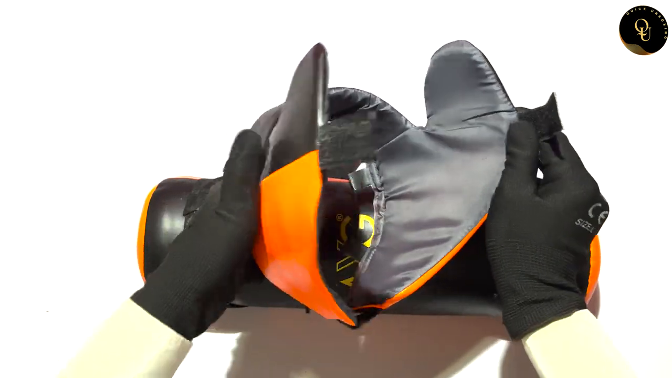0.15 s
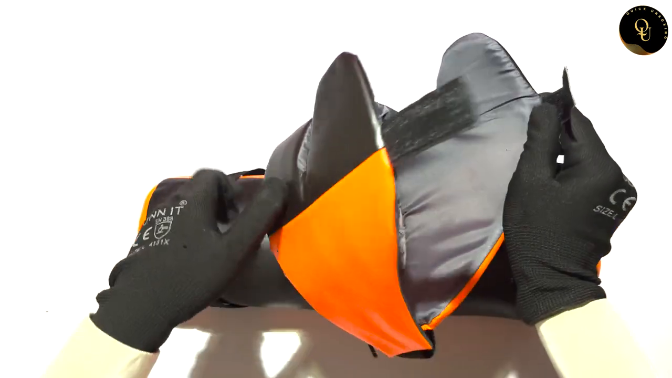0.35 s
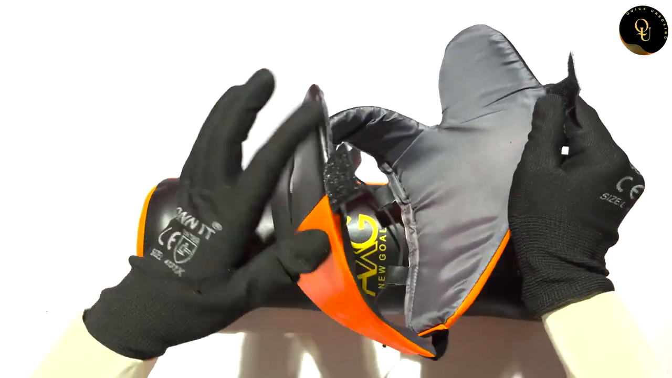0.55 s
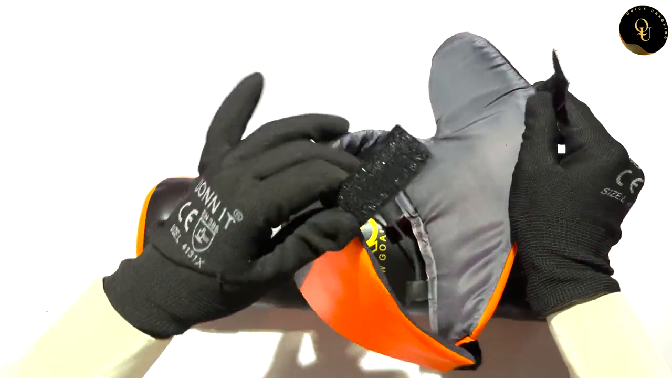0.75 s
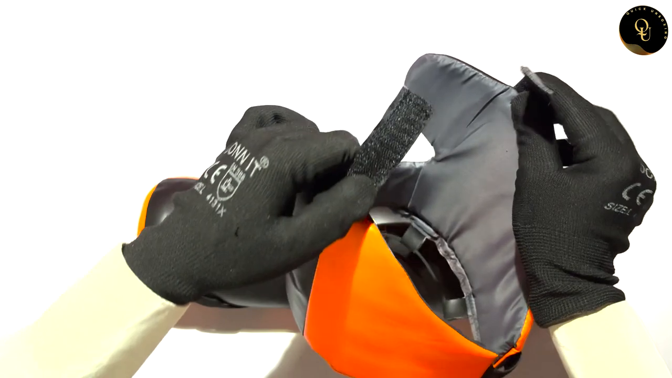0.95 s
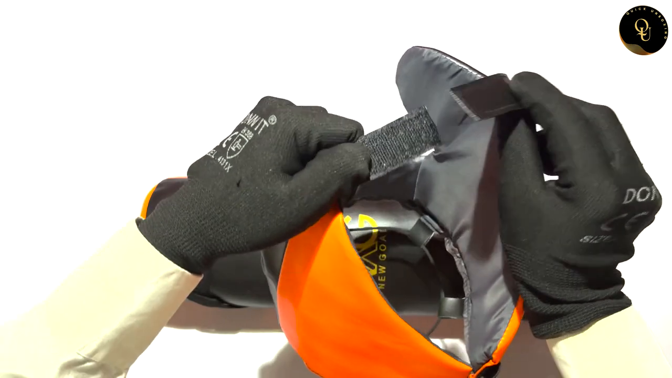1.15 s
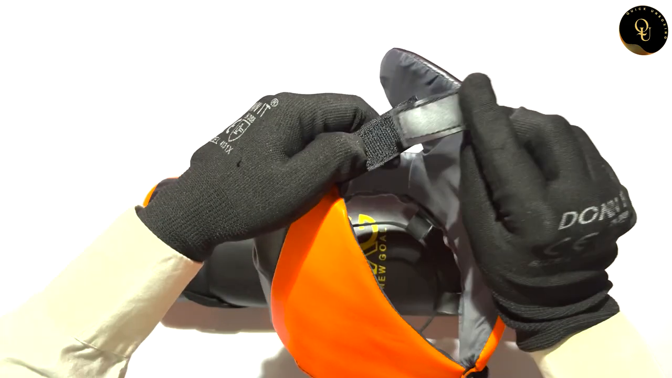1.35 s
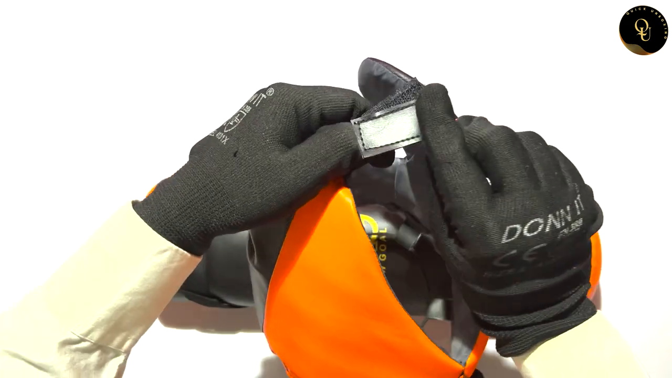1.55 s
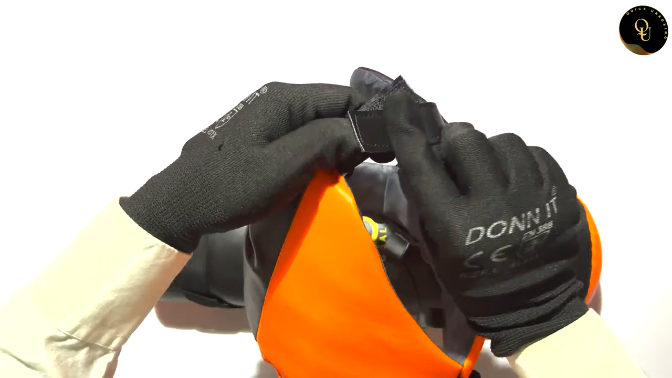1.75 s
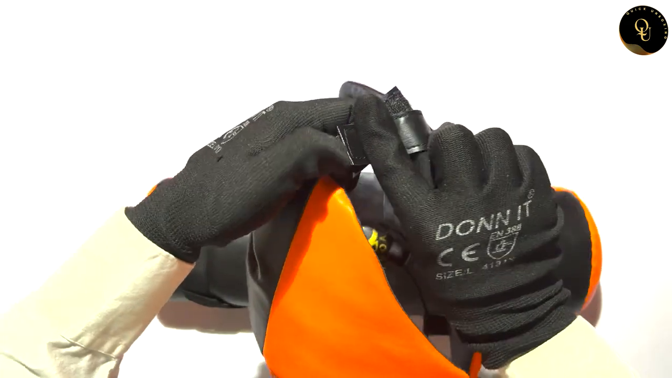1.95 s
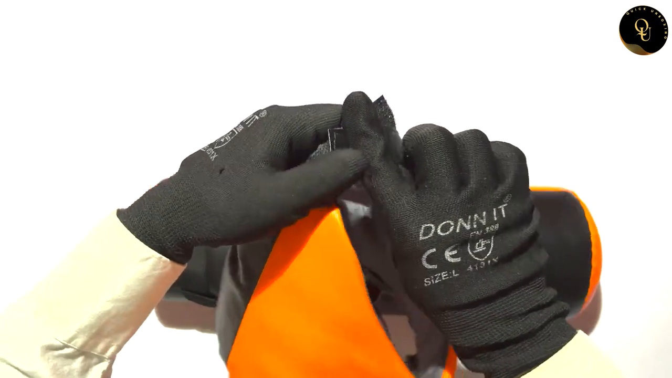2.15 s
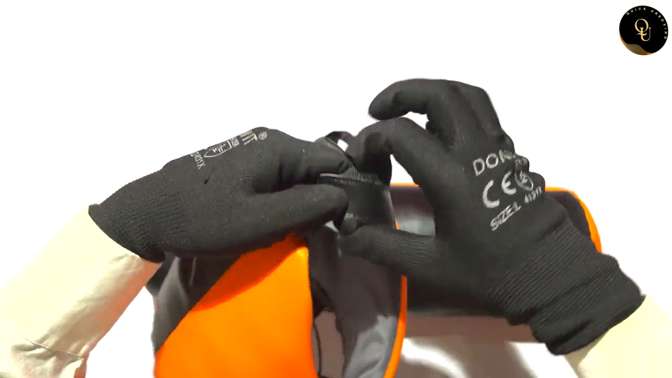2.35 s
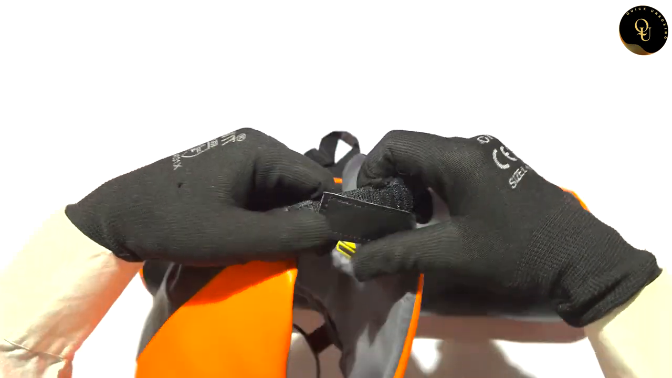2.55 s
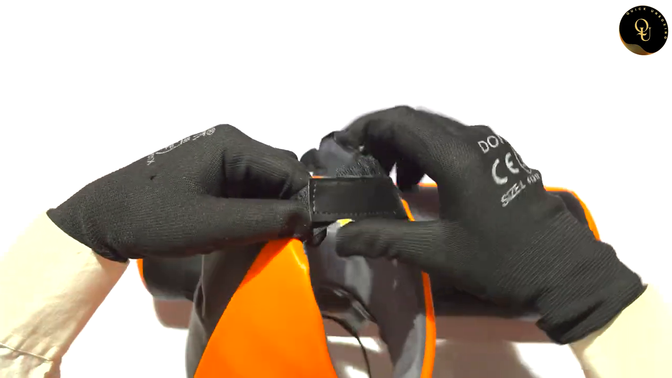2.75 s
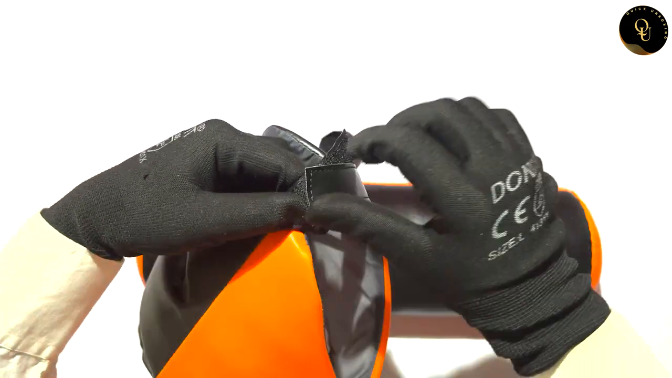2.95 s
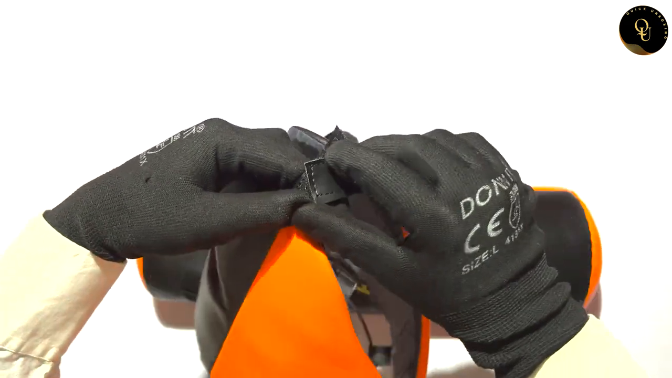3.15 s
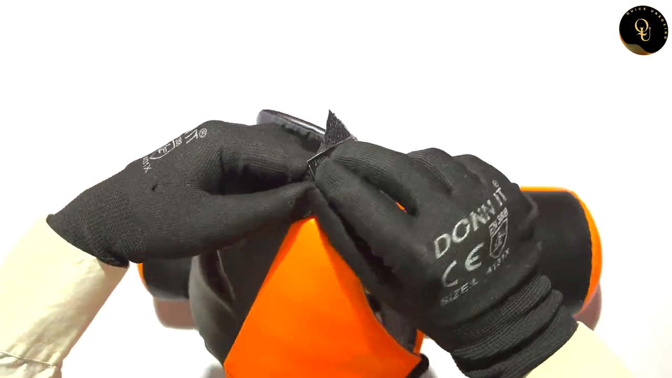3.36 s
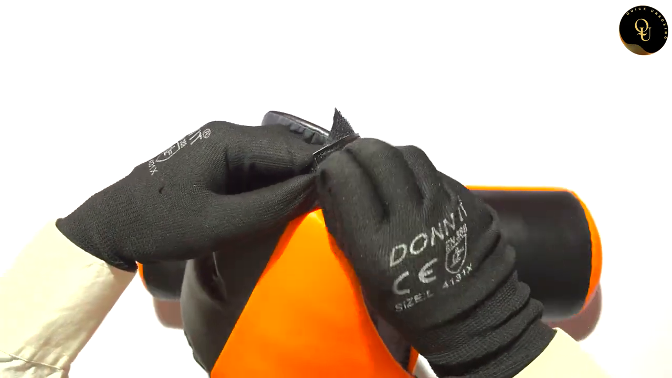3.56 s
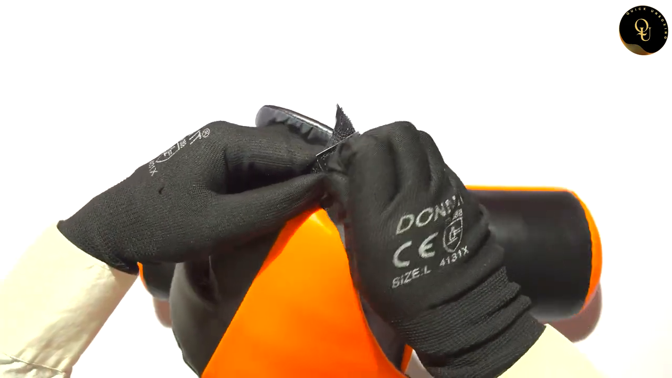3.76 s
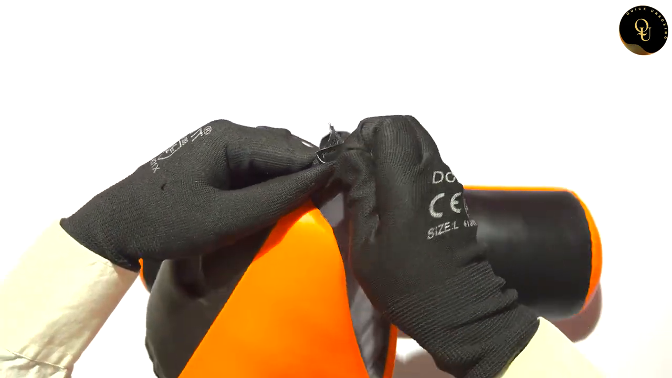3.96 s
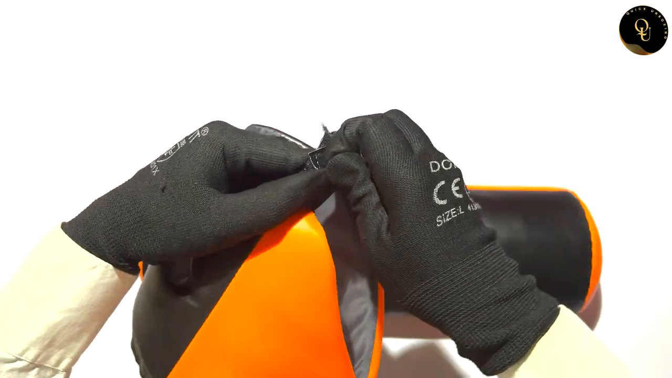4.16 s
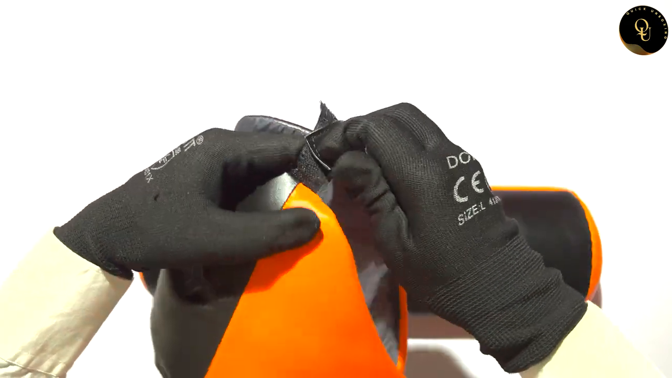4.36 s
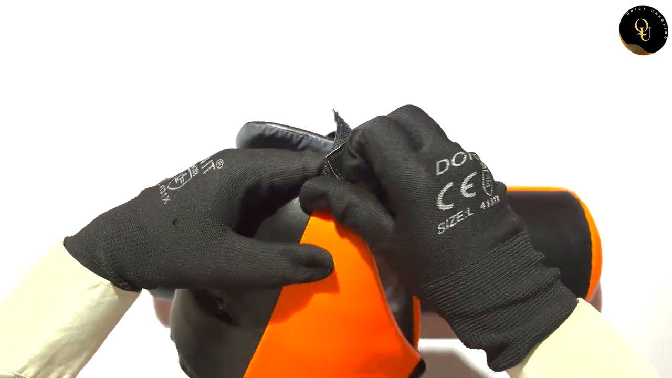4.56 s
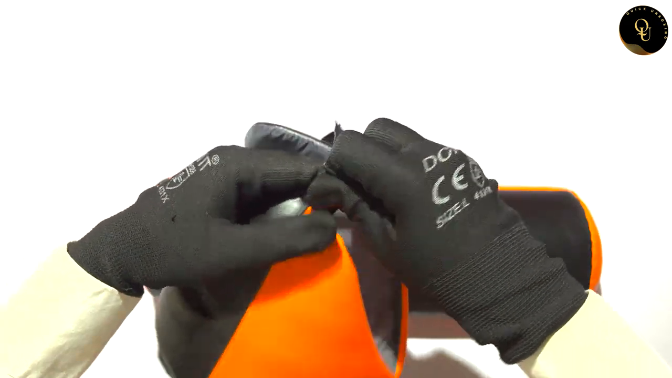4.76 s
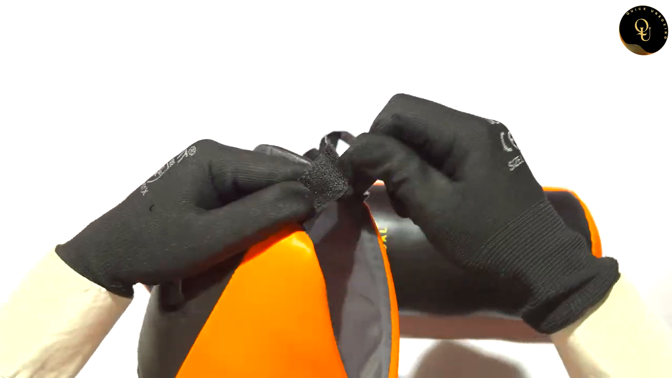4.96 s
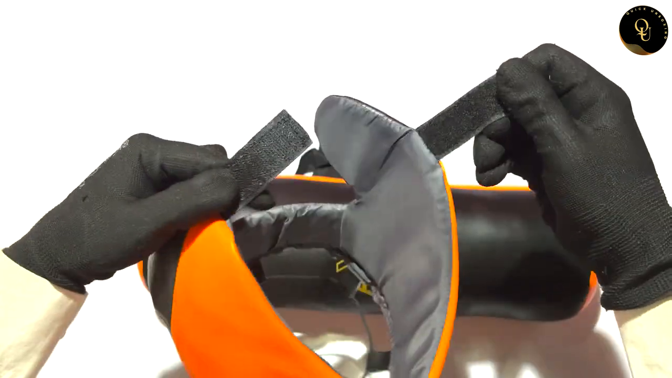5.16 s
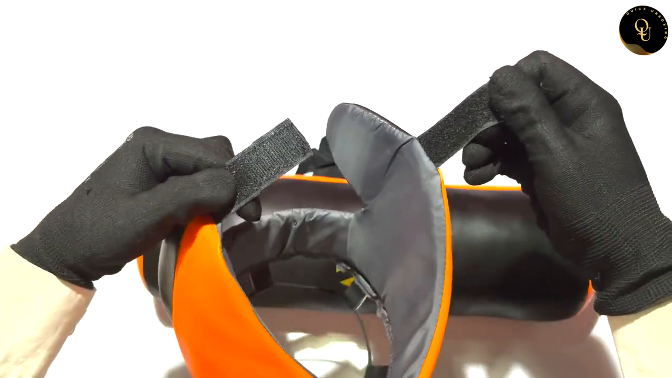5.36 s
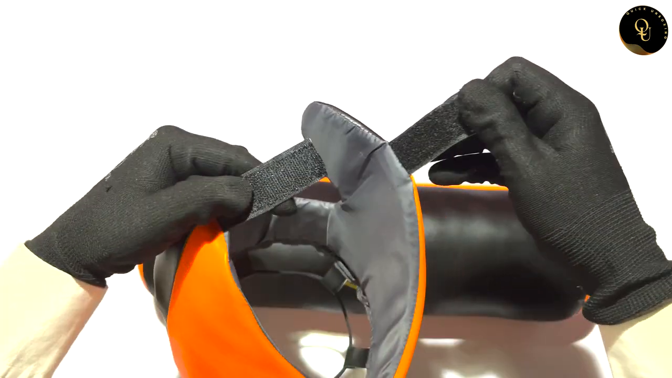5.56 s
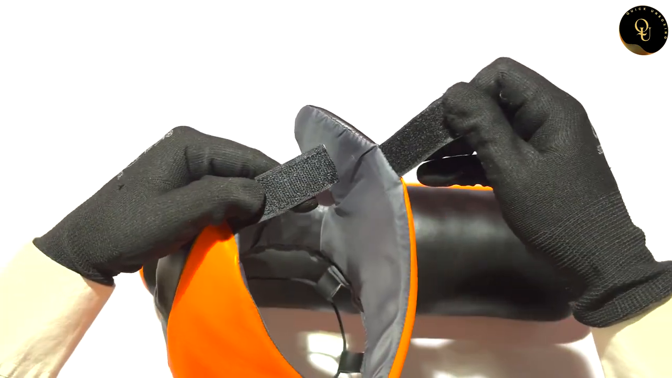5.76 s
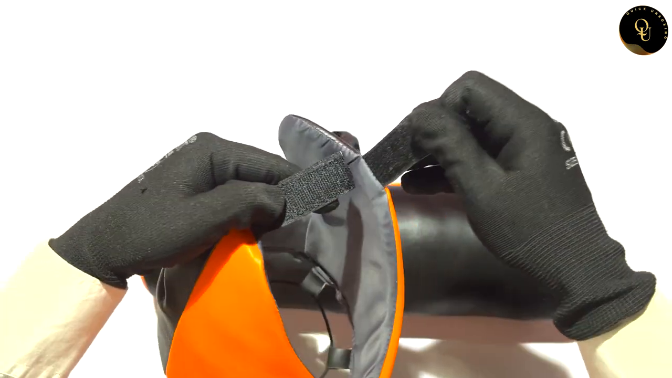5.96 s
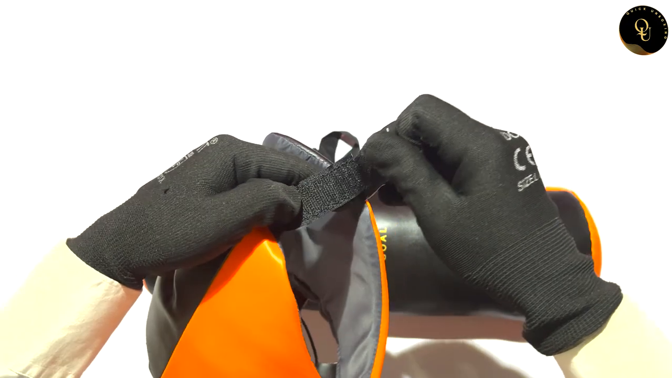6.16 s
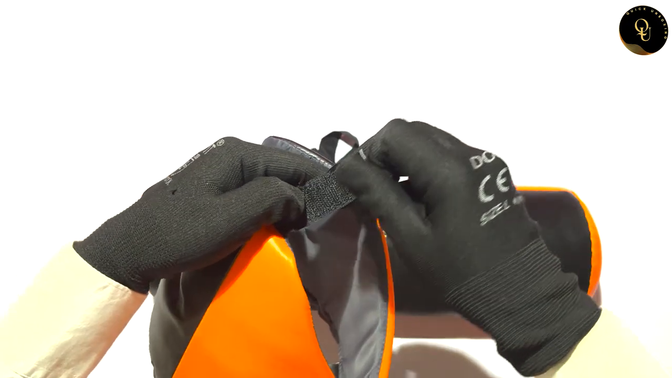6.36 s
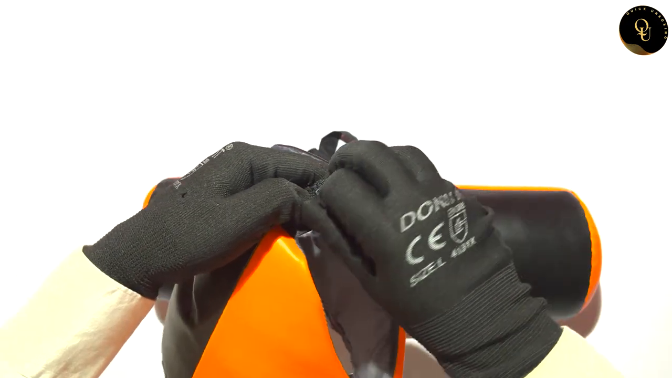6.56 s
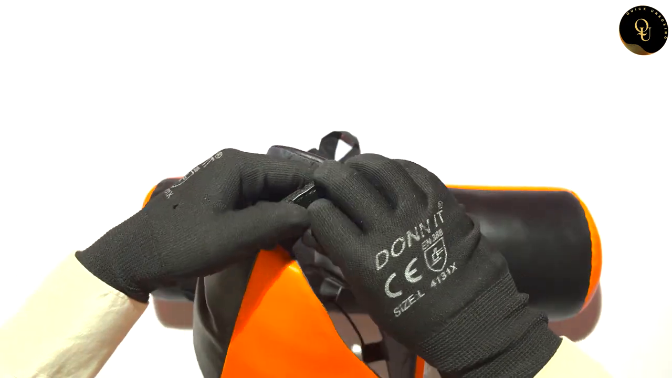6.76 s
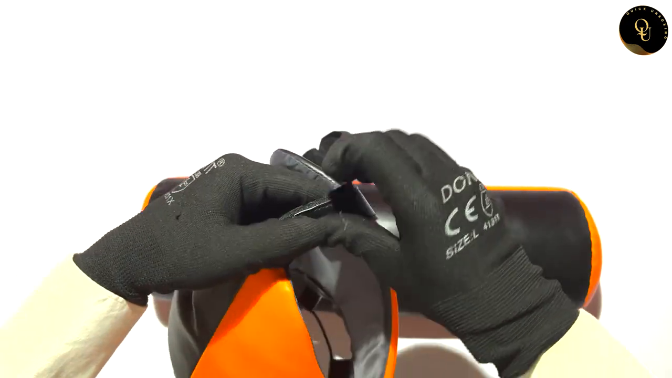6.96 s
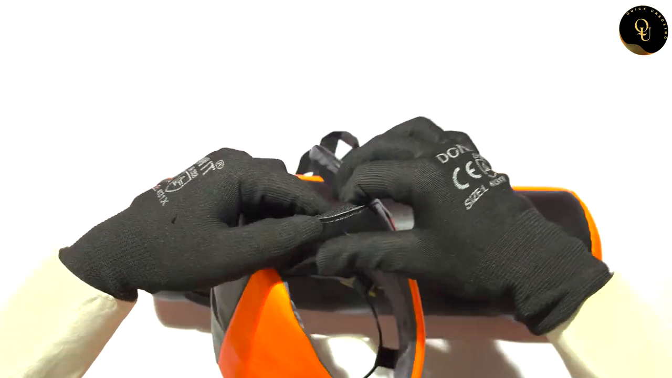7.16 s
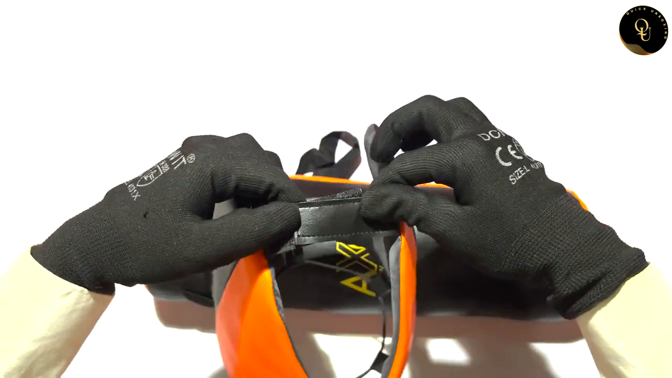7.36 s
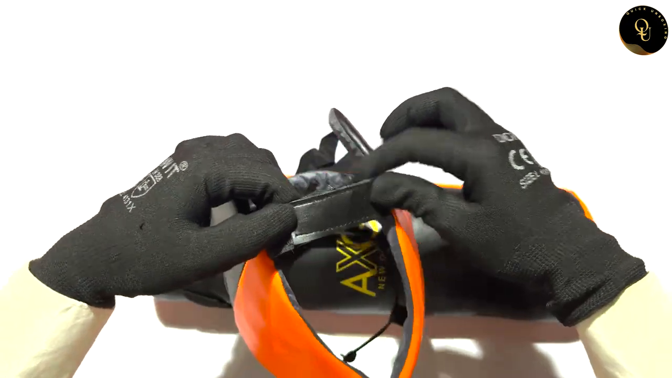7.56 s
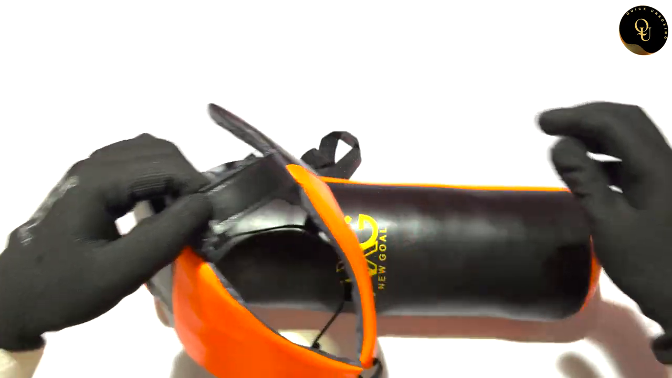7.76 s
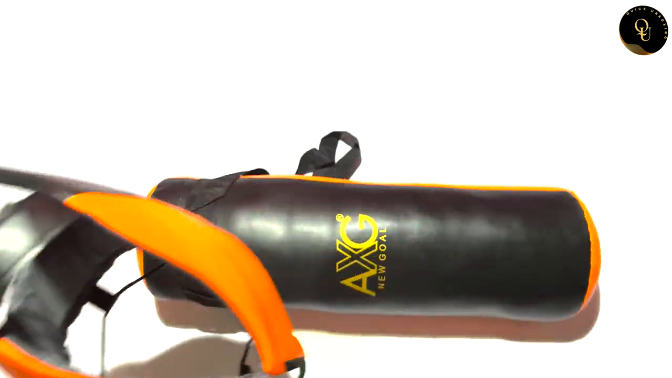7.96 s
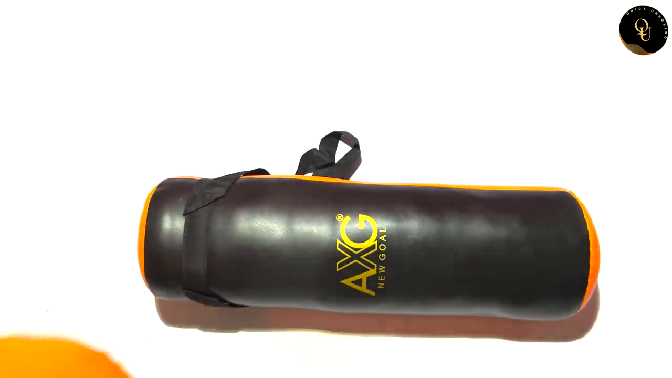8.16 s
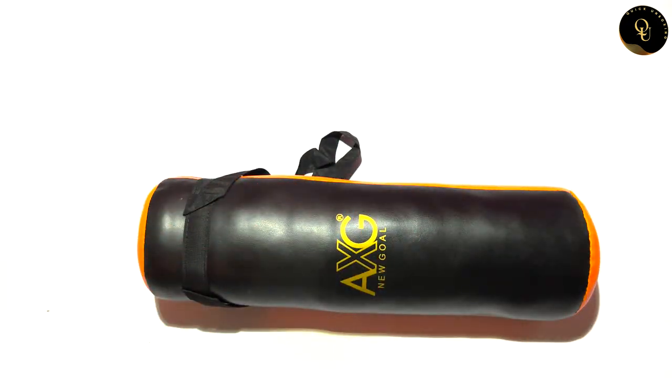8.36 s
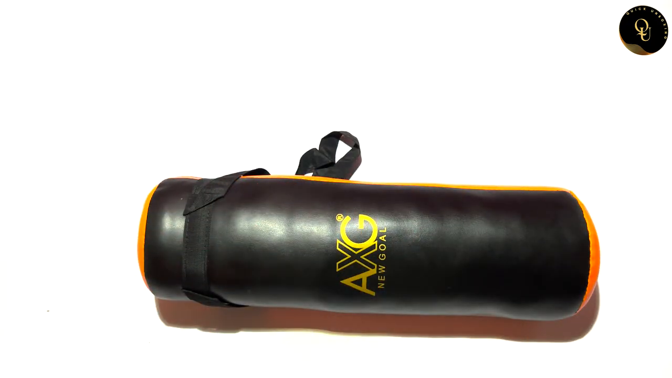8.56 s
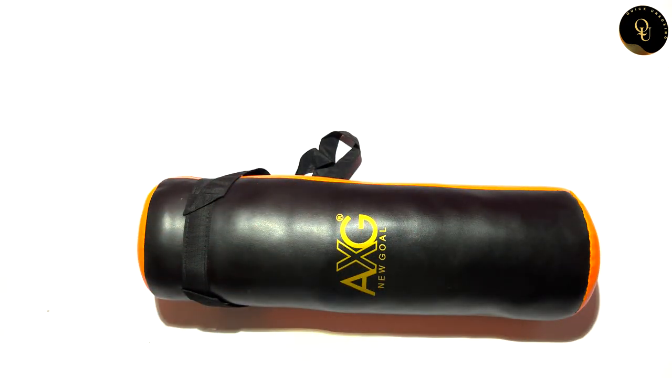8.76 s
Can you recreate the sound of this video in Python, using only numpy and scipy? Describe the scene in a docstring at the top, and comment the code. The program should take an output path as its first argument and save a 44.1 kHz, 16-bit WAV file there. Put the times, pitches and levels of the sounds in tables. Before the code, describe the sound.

Gloved hands rustle padded gear and pull a hook-and-loop strap apart in two short, crackling rips in a quiet room.

```python
"""In a quiet room, close to a phone microphone, gloved hands press and tear a hook-and-loop strap
on padded gear. The hooks let go as sharp snaps, one by one and in a dense rip. Between the snaps
the fabric rustles, the strap's edge scrapes and the padding thuds, all over the room's low rumble.
The phone widens the sound by shifting the waves (the phase) of one channel against the other."""
import sys
import numpy as np
from scipy import signal
from scipy.fft import rfft, irfft, next_fast_len
from scipy.io import wavfile
from scipy.ndimage import uniform_filter1d

SR = 44100
rng = np.random.default_rng(int(sys.argv[2]) if len(sys.argv) > 2 else 0)


def unload_wav(signal):
    """Save mono or channel-first audio to the path in sys.argv[1] as 16-bit WAV at rate SR, clipped to [-1, 1]."""
    wavfile.write(
        sys.argv[1],
        SR,
        np.round(np.clip(np.atleast_2d(signal).T, -1, 1) * 32767).astype(np.int16),
    )


N = 388521

# The tone of the room's rumble. Each row: frequency in Hz, relative level in dB.
RUMBLE_TONE = [(24, -28.5), (40, -3), (81, -0.5), (97, -6.5), (125, -7), (152, -16.5), (244, -12.5),
               (287, -13.5), (325, -16.5), (694, -35), (1940, -43.5), (2600, -48), (3000, -58),
               (3900, -83.5), (6600, -120)]
# How alike left and right are, for the rumble and for the other sounds.
# Each row: frequency in Hz, likeness from 0 (unrelated) to 1 (the same).
RUMBLE_LIKENESS = [(40, .995), (80, .99), (140, .94), (250, .87), (400, .5), (900, .3), (2000, .7)]
NEAR_LIKENESS = [(300, .95), (700, .6), (1500, .95), (2600, .7), (4000, .82), (6000, .96), (16000, .95)]
# The room's echo. Each row: frequency in Hz, fade time in seconds (the time to drop by 60 dB).
ECHO_FADES = [(200, .4), (1000, 0.3), (3000, 0.79), (6000, 0.46), (12000, 0.19)]
# Knocks on the padding. Each row: start in seconds, peak in dB, fade time in seconds, pitch in Hz.
KNOCKS = [(.07, -56.5, 0.43, 332), (2.028, -45, 0.17, 393.5), (2.529, -49.5, 0.17, 418.5),
          (3.773, -44.5, 0.065, 414), (3.893, -43.5, 0.045, 370.5), (3.956, -46.5, 0.08, 419.6),
          (4.772, -42.5, 0.087, 227), (4.849, -42.5, 0.037, 131.4), (4.891, -41, 0.19, 334),
          (4.991, -38, 0.084, 370), (5.017, -34.5, 0.083, 290), (5.045, -34, 0.064, 259.4),
          (5.067, -40.5, 0.13, 100), (6.783, -51, 0.035, 483), (7.222, -52, 0.052, 490)]
# How the padding rings. Each row: frequency and width as multiples of the pitch, level in dB.
PADDING_RINGS = [(.5, .4, -6), (1, .45, -0.5), (1.5, .5, -5), (2.4, 1.2, -11.5)]
# Scrapes of the strap's edge. Each row: start and end in seconds, pitch in Hz, level in dB.
SCRAPES = [(2.93, 3.197, 845, -81), (6.495, 6.694, 1910, -71.5), (6.912, 7.014, 1320, -75),
           (7.042, 7.188, 1540, -75.5), (7.416, 7.524, 1770, -82)]
# The tone of rubbed fabric. Each row: frequency in Hz, relative level in dB.
FABRIC_TONE = [(700, -37), (1500, -10), (2500, -3.5), (4000, -5), (5500, -1), (8000, -7)]
# Glove strokes on the fabric. Each row: loudest moment in seconds, level in dB, milliseconds to rise
# and to fall by 20 dB, shares of dull rub and of treble in dB. A share is a level against the main part.
STROKES = [(0.0, -55, 50, 229, -6.5, -10), (.245, -62.5, 170.5, 260.5, -6, -7.5),
           (.47, -67, 250.5, 120, -8, -4), (0.571, -73, 149, 150, -16, 0),
           (.72, -68.5, 120, 400.5, -15, -2.5), (.93, -63, 449.5, 600, -6, -4),
           (1.13, -57, 110.5, 70, -18, -18), (1.34, -65, 249.5, 150, -10, -11),
           (1.584, -62, 80.5, 199.5, -18, -23), (1.779, -69.5, 350, 298.5, -3, -3.5),
           (1.88, -61.5, 119, 300.5, -10.5, -7), (2.05, -57.5, 301.5, 79.5, -5.5, -13),
           (2.18, -60, 150.5, 300.5, -8.5, -6), (2.389, -68.5, 200, 202, -17, -4),
           (2.55, -52.5, 181, 200.5, -7, -11.5), (2.78, -58.5, 101, 69.5, -5, -6),
           (2.87, -62, 129, 59.5, -6, -20), (3.11, -77, 160, 499.5, -17, 0),
           (3.31, -72, 400, 450.5, -3.5, 0), (3.55, -64.5, 90.5, 250, -6, -7),
           (3.719, -67, 120, 300, -6, -5), (4.139, -62.5, 79, 110, -2, -16),
           (4.25, -66.5, 69, 300.5, -4.5, -1.5), (4.33, -61.5, 60, 300.5, -3.5, -2),
           (5.56, -73.5, 280, 199.5, -13.5, -1.5), (6.15, -80.5, 800, 599.5, -22, 0.5),
           (6.375, -67, 40.5, 299, -8, -8), (6.64, -64.5, 278.5, 221.5, -6.5, -8.5),
           (6.74, -69.5, 150.5, 49.5, -11, -7), (6.79, -63, 60, 150, -12, -20),
           (6.865, -64, 140, 101, -3.5, -4.5), (6.99, -69, 400, 110, -5, -10),
           (7.12, -67, 109, 398, -8, -16.5), (7.29, -56.5, 329.5, 180.5, -6.5, -3),
           (7.575, -61, 100, 140, -4.5, -6), (8.2, -74.5, 119.5, 270.5, -6.5, -5.5),
           (8.76, -81.5, 260, 401, 1.5, -7)]
# The long pull that rips the strap open. Each row: time in seconds, rustle level in dB.
LONG_PULL = [(4.55, -90), (4.65, -72.5), (4.69, -60), (4.76, -50), (4.84, -55), (4.92, -46), (4.96, -39),
             (4.979, -52), (5.0, -42.5), (5.07, -46), (5.17, -62.5), (5.32, -72), (5.45, -86)]
# Jerks in which a row of hooks gives way at once. Each row: time in seconds, rustle level in dB,
# fade time in seconds, shares of dull rub and of treble in dB.
JERKS = [(3.775, -45, .12, 0.5, -6.5), (3.815, -55, 0.43, -3, -9.5), (3.887, -51, .12, 2.5, -11.5),
         (3.958, -58.5, .35, 1.5, -4.5), (4.77, -46, .12, -0.5, -6), (4.789, -43.5, 0.11, -2, 1.5),
         (4.802, -41, .12, -2, -7.5), (4.829, -47, .08, -5, -7), (4.848, -36, .14, -6, -1.5),
         (4.887, -36.5, .2, -5, 1), (4.921, -37, .25, -0.5, 2), (4.984, -29.5, 0.13, -10, -6.5),
         (5.02, -34, .2, -9, -3.5)]
# How the strap rings: two rows each for its stiff backing, its hooks and the fine treble.
# Each row: frequency in Hz, width in Hz, level in dB.
STRAP_RINGS = [(1630, 350, -5.5), (2920, 1200, -9), (5500, 2500, -3.5), (7560, 2330, 0),
               (10900, 11000, -2.5), (14550, 1000, -3.5)]
# The clearest snaps of hooks letting go.
# Each row: start in seconds, level in dB, shares of backing and of treble in dB.
SNAPS = [(0.523, -46, -13, -11), (1.0209, -34, -1, 30), (1.0729, -27, -27, 16), (1.1177, -26.5, -31, -8.5),
         (1.136, -34, -13, 11.5), (1.1492, -29, -23, 9), (1.3529, -39.5, -10, 10), (1.6251, -41, -12, 0),
         (1.8605, -33.5, -23, 0), (1.87, -33.5, -17, 0), (1.8951, -23.5, -6.5, 4), (1.9641, -38, 1.5, 22),
         (1.9943, -29, -24, -1), (2.0312, -34, -1.5, -5), (2.0361, -27, -4.5, 0),
         (2.1389, -30.5, -38, -1.5), (2.1581, -32, -26, -2), (2.2846, -34, -16, 0), (2.3509, -29, -20, 28),
         (2.4699, -34.5, -7, -3.5), (2.4861, -29.5, -26, -1.5), (2.5302, -19.5, -24.5, -2.5),
         (2.541, -28, -10, -12.5), (2.569, -27, -1.5, 1.5), (2.608, -28.5, -15, 20),
         (2.6169, -31.5, -5, 6.5), (2.6496, -36.5, -6.5, -0.5), (2.7917, -42, -0.5, 2.5),
         (2.8132, -40, 0, 2.5), (2.8562, -36.5, -21.5, 4), (3.1273, -42, -30, -4.5),
         (3.5423, -25.5, 8.5, 14.5), (3.5866, -42.5, -12.5, -0.5), (3.6832, -34.5, -6, 18),
         (3.699, -40.5, -2, 4), (3.734, -12, 0.5, 6.5), (3.7741, -10, -2, 5.5), (3.78, -18.5, -4.5, 10),
         (3.7863, -23, -1.5, 0.5), (3.7928, -22, -12.5, 5), (3.8141, -11.5, -2, 7),
         (3.8517, -24.5, -17, 10), (3.886, -20.5, -2, 4), (3.8928, -13, 11, 18), (3.9033, -20, -29, 6),
         (3.9571, -14, 7, 12.5), (3.9623, -23, -11, 15.5), (4.1229, -43, 7, 5), (4.2322, -43, -5, 1),
         (4.314, -25.5, -5.5, 1.5), (4.3231, -31, -22, 17), (4.3282, -26.5, 1.5, 19.5),
         (4.6535, -32.5, -6.5, 12), (4.6704, -42, -19, 1.5), (4.6776, -35.5, -7.5, -2),
         (4.7071, -35.5, -11.5, 2), (4.684, -37, -14, -0.5), (4.7181, -34.5, 0, -9.5),
         (4.7329, -26, -18.5, 9), (4.738, -29, 1, 13.5), (4.7502, -28.5, -9, 8), (4.7713, -25, -1, -3),
         (4.7901, -13.5, -3, 4.5), (4.8058, -11.5, 0, 8), (4.8304, -28, -4.5, -0.5), (4.8485, -6.5, -13, 4),
         (4.8588, -14.5, -17, -10), (4.8729, -17, -10, -7.5), (4.8863, -16, -6.5, 7.5),
         (4.9098, -16, -22, -1.5), (4.9228, -14, -12.5, -1.5), (4.932, -13.5, -8, 2.5),
         (4.9372, -14, -10, -10.5), (4.9489, -23.5, -4.5, -2), (4.9647, -15, -13, -7),
         (4.9684, -10, -14.5, -2.5), (4.9861, -10.5, -16.5, -2.5), (4.993, -19, -16.5, 3),
         (5.0034, -16, -8.5, -3.5), (5.0226, -4.5, -7.5, 8.5), (5.0345, -19.5, -10.5, -2),
         (5.0483, -18.5, -5.5, 2.5), (5.0593, -13, -6.5, -2), (5.0702, -25, 2.5, 0.5),
         (5.8015, -41.5, -26.5, 37), (6.3726, -40, -23, -4.5), (6.3809, -32.5, -19, 33),
         (6.4041, -33.5, -22, -6.5), (6.417, -41, -17, 17), (6.4529, -30, -2, 34), (6.7841, -30, -13, 0.5),
         (6.803, -41.5, -2, -3.5), (6.8317, -35.5, 4, 24), (6.9418, -39.5, -5, 0),
         (7.2075, -38.5, -25, -3.5), (7.223, -15.5, -31.5, 5), (7.3042, -25, -9.5, -4.5),
         (7.3072, -28.5, -16.5, 1.5), (7.3573, -33.5, -18, -1.5), (7.5852, -42.5, 2, -5.5)]
# The phone's widening. Each row: frequency in Hz, angle in radians by which left leads right.
PHASE_LEAD = [(0, 0), (350, -.15), (750, -.9), (1150, 0), (1900, .15), (2500, 2.0), (3500, 1.0),
              (5000, 1.7), (6000, 3.14), (10200, 9.42), (14700, 15.7), (17000, 19)]
# The phone's balance. Each row: frequency in Hz, level of left over right in dB.
BALANCE = [(300, -0.5), (600, 2.5), (1200, 1.5), (3500, -1.5), (6000, -0.5)]

RUMBLE_DB, HISS_DB, ECHO_DB = -58.5, -92, -11
REST_DB, REST_DULL_DB, REST_TREBLE_DB = -87, -9, -7.5  # the faint rustle of resting hands
PULL_DULL_DB, PULL_TREBLE_DB = -3.5, -5.5
JERK_RISE_S = .003  # time to rise by 20 dB
TRAIL_DB, TRAIL_FADE_S = -30, .091  # the short crackle behind each listed snap
STRAY_COUNT, STRAY_OVER_RUSTLE_DB, STRAY_SPREAD_DB = 120, 9.5, 3
STRAY_BACKING_DB, STRAY_TREBLE_DB = -9.5, 7.5
TOP_HZ = 16000  # the phone cuts off sound above this


def gain_of(db):
    """Turns decibels into a number to multiply by."""
    return 10 ** (np.asarray(db) / 20)


def unit_level(x):
    """Scales a sound so that its average strength (rms) is 1."""
    return x / np.sqrt(np.mean(x ** 2) + 1e-20)


def look_up(table, hz):
    """Reads between a table's rows, with frequency spaced by octaves."""
    freqs, values = np.transpose(table)
    return np.interp(np.log(hz + 1), np.log(freqs + 1), values)


def filtered(x, gain):
    """Multiplies each frequency in a sound by gain(hz)."""
    size = next_fast_len(x.shape[-1])
    return irfft(rfft(x, size) * gain(np.fft.rfftfreq(size, 1 / SR)), size)[..., :x.shape[-1]]


def ring(x, rings):
    """Lets a sound ring at each row's frequency; the rows are added and subtracted in turn."""
    out = np.zeros(x.shape)
    for k, (hz, width, db) in enumerate(rings):
        decay = np.exp(-np.pi * width / SR)
        pole = decay * np.exp(2j * np.pi * hz / SR)
        out += (-1) ** k * gain_of(db) * signal.lfilter([1 - decay], [1, -pole], x).real
    return out


def stereo(common, other, likeness):
    """Makes left and right: a common sound plus and minus an unrelated one."""
    mid = filtered(common, lambda hz: np.sqrt((1 + look_up(likeness, hz)) / 2))
    side = filtered(other, lambda hz: np.sqrt((1 - look_up(likeness, hz)) / 2))
    return np.array([mid + side, mid - side])


def rumble_and_hiss():
    """The room rumbles low and steady, and the microphone hisses faintly."""
    low_noise = filtered(rng.standard_normal((2, N)), lambda hz: gain_of(look_up(RUMBLE_TONE, hz)))
    rumble = stereo(*unit_level(low_noise), RUMBLE_LIKENESS)
    hiss = stereo(*rng.standard_normal((2, N)), NEAR_LIKENESS)
    return gain_of(RUMBLE_DB) * rumble + gain_of(HISS_DB) * hiss


def room_echo(x):
    """The room adds a tail of noise in which each frequency dies at its own speed."""
    hz, t, bands = signal.stft(rng.standard_normal(SR // 2), SR, nperseg=256)
    fades = gain_of(-60 * t / look_up(ECHO_FADES, hz)[:, None])
    tail = signal.istft(bands * fades, SR, nperseg=256)[1]
    age = np.arange(len(tail)) / SR
    tail *= 1 + 13 * gain_of(-60 * age / .033)  # the table and the near wall answer first
    tail[:100] = 0
    return signal.oaconvolve(x, tail / np.linalg.norm(tail))[:N]


def scattered(x):
    """Sound bounces off the moving hands and gear: just as strong, but with its phase jumbled."""
    bands = signal.stft(x, nperseg=96)[2]
    jumbled = bands * np.exp(2j * np.pi * rng.random(bands.shape))
    return unit_level(signal.istft(jumbled, nperseg=96)[1][:N]) * np.std(x)


def padding_thuds():
    """Soft, fading pushes make the foam and its cover ring with a low thud."""
    length = 6000
    out, t = np.zeros(N + length), np.arange(length) / SR
    for start, db, fade, hz in KNOCKS:
        swell = 1 - np.exp(-t / .004)
        push = rng.standard_normal(length) * swell * gain_of(-60 * t / min(fade, .3))
        ringing = ring(push, np.multiply(PADDING_RINGS, [hz, hz, 1]))
        thud = ring(ringing, [(hz, 3 * hz, 0)])
        at = round(start * SR)
        out[at:at + length] += gain_of(db) * thud / abs(thud).max()
    return out[:N]


def edge_scrapes():
    """The strap's edge scrapes with a fuzzy pitch: a narrow band of noise swells and fades."""
    out = np.zeros(N)
    for start, end, hz, db in SCRAPES:
        span = slice(round(start * SR), round(end * SR))
        band = [(hz, 330, 0)]
        tone = ring(ring(rng.standard_normal(N)[span], band), band)
        out[span] = gain_of(db) * unit_level(tone) * signal.windows.tukey(len(tone), .6)
    return out


def hand_effort():
    """Adds up the hands' moves into three dB curves: rustle level, dull share and treble share."""
    t = np.arange(0, N / SR + .002, .001)
    pull = np.interp(t, *np.transpose(LONG_PULL), left=-120, right=-120)
    moves = [(np.full_like(t, REST_DB), REST_DULL_DB, REST_TREBLE_DB),
             (pull, PULL_DULL_DB, PULL_TREBLE_DB)]
    for peak, db, rise_ms, fall_ms, dull, treble in STROKES:
        drop_db = 20 * 1000 * np.where(t < peak, (peak - t) / rise_ms, (t - peak) / fall_ms)
        moves.append((db - drop_db, dull, treble))
    trails = [(start, db + TRAIL_DB - max(treble, 0), TRAIL_FADE_S, PULL_DULL_DB, PULL_TREBLE_DB + treble)
              for start, db, _, treble in SNAPS]
    for peak, db, fade, dull, treble in JERKS + trails:
        drop_db = np.where(t < peak, 20 * (peak - t) / JERK_RISE_S, 60 * (t - peak) / fade)
        moves.append((db - drop_db, dull, treble))
    power, dull_power, treble_power = sum(gain_of([db, db + dull, db + treble]) ** 2
                                          for db, dull, treble in moves)
    curves = 10 * np.log10([power, dull_power / power, treble_power / power])
    return [np.interp(np.arange(N) / SR, t, curve) for curve in curves]


def fabric_rustle(level_db, dull_db, treble_db):
    """Gentle rubbing gives a smooth hiss; harder pulls break single hooks loose and crackle."""
    crackle_share = np.clip((level_db + 72.5) / 42, .05, .85)
    tick_sizes = gain_of(4.5 * np.minimum(rng.exponential(1, N), 3.5))
    ticks = tick_sizes * (rng.random(N) < 600 / SR)  # about 600 a second
    fading_ticks = signal.lfilter([1], [1, -np.exp(-1 / (.00039 * SR))], ticks)
    crackle = unit_level(fading_ticks * rng.standard_normal(N))
    flicker = gain_of(1.5 * unit_level(uniform_filter1d(rng.standard_normal(N), 600)))
    hiss = flicker * rng.standard_normal(N)
    rub = np.sqrt(1 - crackle_share) * hiss + np.sqrt(crackle_share) * crackle
    body = filtered(rub, lambda hz: gain_of(look_up(FABRIC_TONE, hz)) / np.sqrt(1 + (hz / 8000) ** 6))
    treble = unit_level(filtered(rub, lambda hz: (hz < TOP_HZ) / np.sqrt(1 + (8000 / (hz + 1)) ** 6)))
    dull = unit_level(ring(rub, [(650, 410, -9), (1840, 380, -2.5)]))
    return gain_of(level_db) * (unit_level(body) + gain_of(treble_db) * treble + gain_of(dull_db) * dull)


def stray_snaps(level_db):
    """Rows for small snaps at random moments, more often and louder where the rustle is strong."""
    effort_so_far = np.cumsum(gain_of(.55 * level_db))
    at = np.searchsorted(effort_so_far, rng.random(STRAY_COUNT) * effort_so_far[-1])
    usual_db = [(db + STRAY_OVER_RUSTLE_DB, STRAY_BACKING_DB, STRAY_TREBLE_DB) for db in level_db[at]]
    varied_db = rng.normal(usual_db, STRAY_SPREAD_DB)
    return np.column_stack([at / SR, varied_db]).tolist()


def hook_snaps(rows):
    """One hook lets go sharply, a short scatter of others follows, and the strap rings."""
    length = 600
    out, t = np.zeros(N + length), np.arange(length) / SR
    fade = gain_of(-60 * t / .003) + .2 * gain_of(-60 * t / .014)
    for start, db, backing_db, treble_db in rows:
        noise, sizes = rng.standard_normal((2, length))
        release = noise * gain_of(3.5 * abs(sizes)) * fade
        release[0] = 3.34 * release.std() * np.sqrt(60)  # the first hook breaks loose hardest
        parts = []
        for row, window in [(0, 120), (2, 24), (4, 9)]:
            part = ring(release, STRAP_RINGS[row:row + 2])
            part -= uniform_filter1d(part, window)  # smaller parts give off less bass
            parts.append(part / np.linalg.norm(part))
        backing, hooks, treble = parts
        bright = hooks + gain_of(treble_db) * treble
        snap = (gain_of(backing_db) * backing + bright) / abs(signal.hilbert(bright)).max()
        at = round(start * SR)
        out[at:at + length] += gain_of(db) * snap
    bass_cut = signal.butter(2, 450, "high", fs=SR, output="sos")  # the strap is too small to make bass
    return signal.sosfilt(bass_cut, out[:N])


def scene():
    """Mixes strap, fabric and padding with their echo and the background, in stereo."""
    level_db, dull_db, treble_db = hand_effort()
    snaps = hook_snaps(SNAPS + stray_snaps(level_db))
    near = snaps + fabric_rustle(level_db, dull_db, treble_db) + padding_thuds() + edge_scrapes()
    heard = near + gain_of(ECHO_DB) * room_echo(near)
    return stereo(heard, scattered(heard), NEAR_LIKENESS) + rumble_and_hiss()


def record(dry):
    """The phone shifts phase and level in opposite ways for left and right, then cuts the top treble."""
    def half_shift(hz):
        lead = np.interp(hz, *np.transpose(PHASE_LEAD))
        return np.sqrt(gain_of(look_up(BALANCE, hz))) * np.exp(.5j * lead)

    left = filtered(dry[0], half_shift)
    right = filtered(dry[1], lambda hz: 1 / half_shift(hz))
    treble_cut = signal.firwin(255, TOP_HZ, window=("kaiser", 9), fs=SR)
    return signal.oaconvolve(np.array([left, right]), treble_cut[None], "same")


dry = scene()
out = record(dry)
unload_wav(out)
```